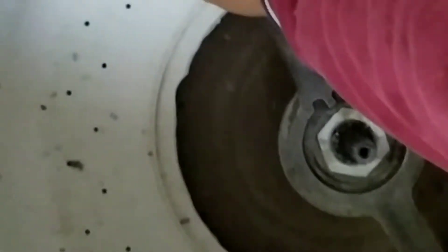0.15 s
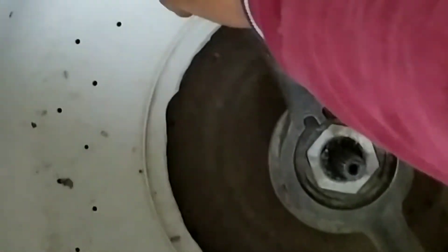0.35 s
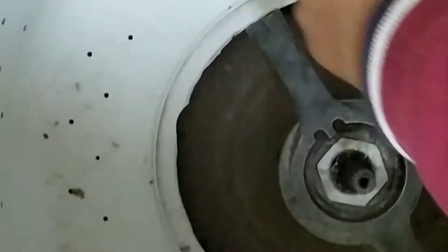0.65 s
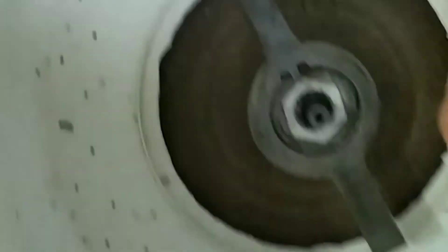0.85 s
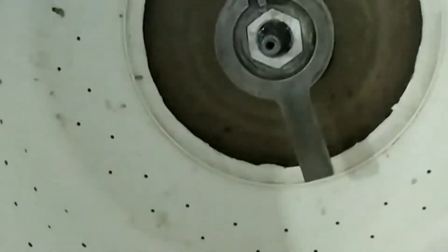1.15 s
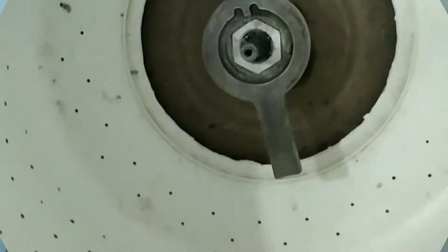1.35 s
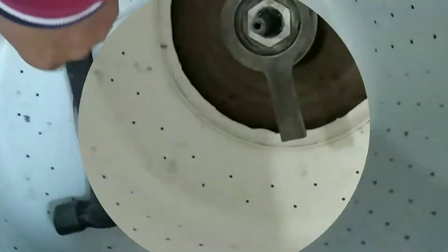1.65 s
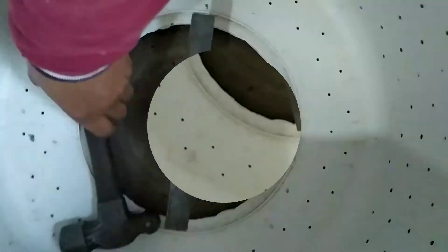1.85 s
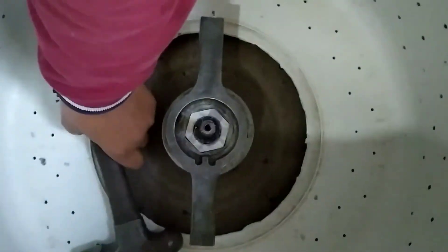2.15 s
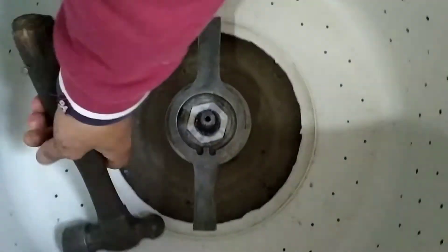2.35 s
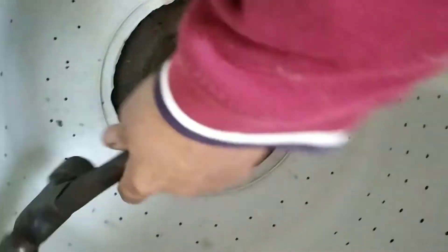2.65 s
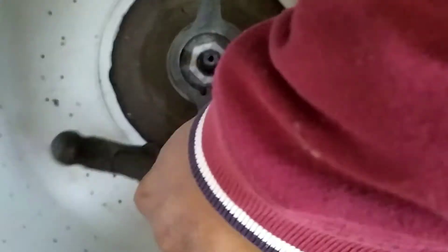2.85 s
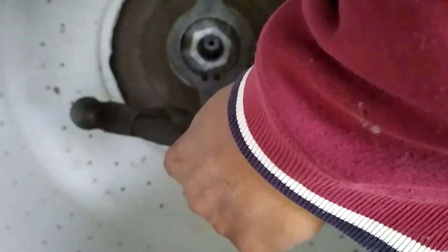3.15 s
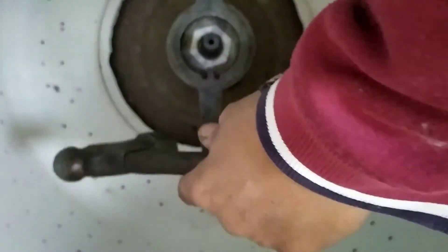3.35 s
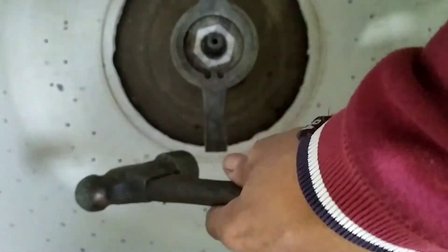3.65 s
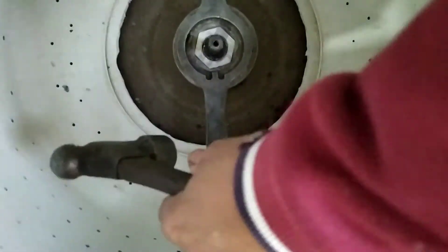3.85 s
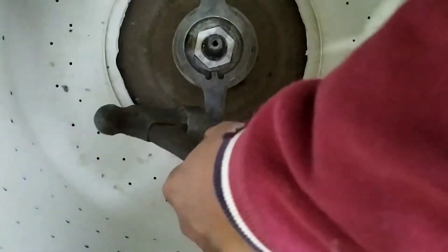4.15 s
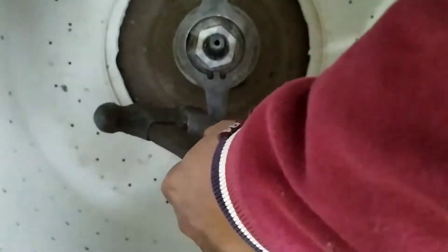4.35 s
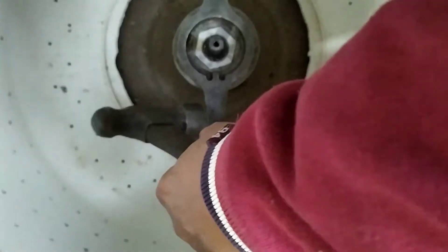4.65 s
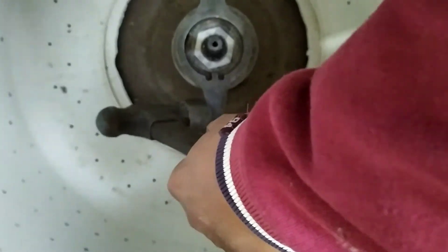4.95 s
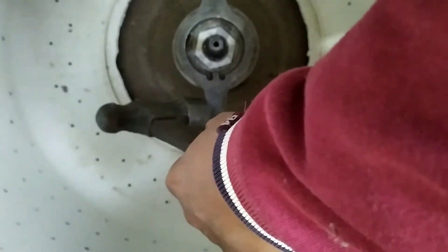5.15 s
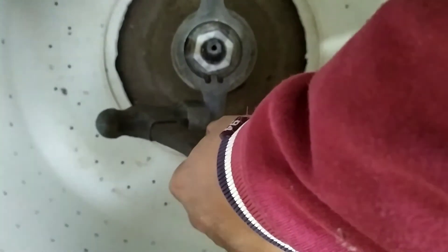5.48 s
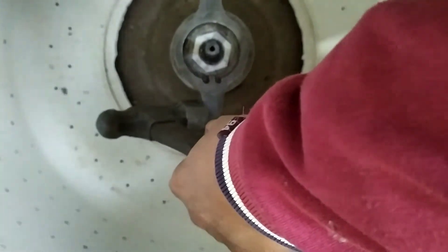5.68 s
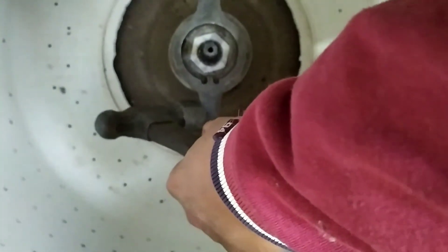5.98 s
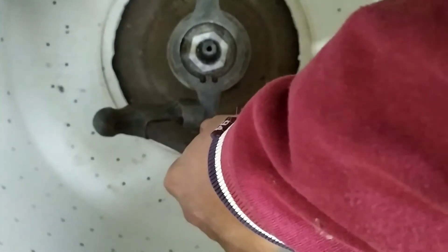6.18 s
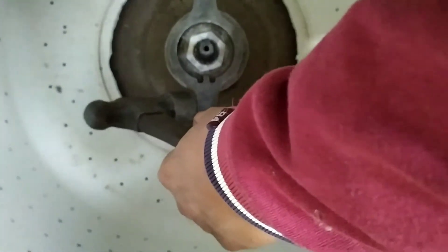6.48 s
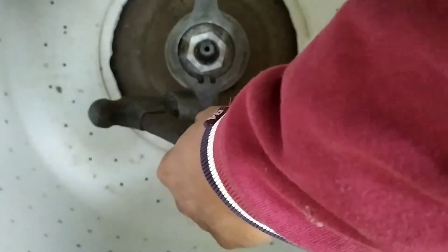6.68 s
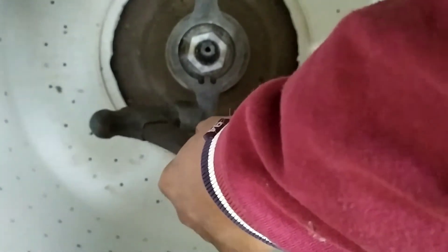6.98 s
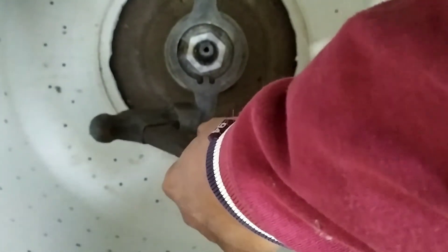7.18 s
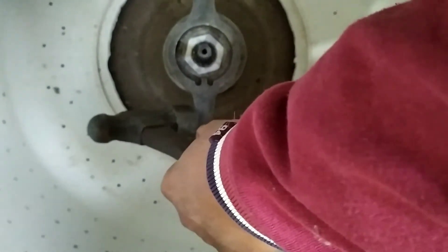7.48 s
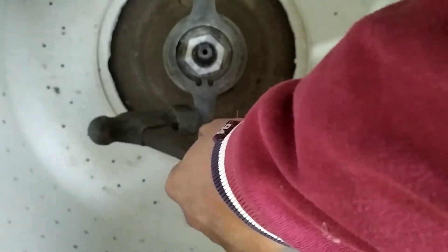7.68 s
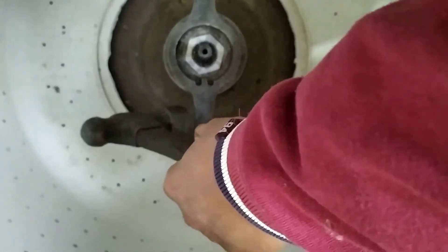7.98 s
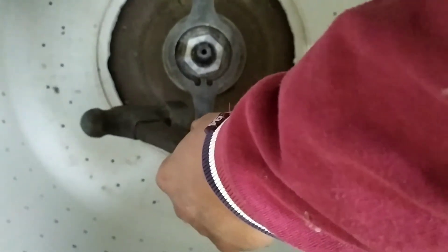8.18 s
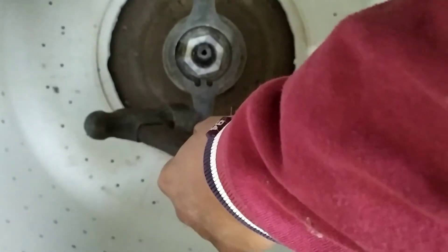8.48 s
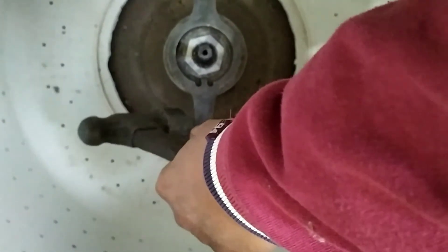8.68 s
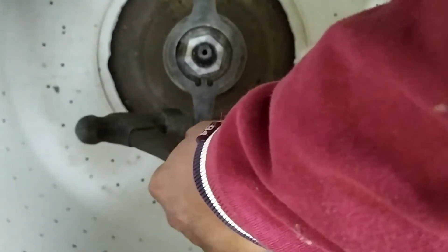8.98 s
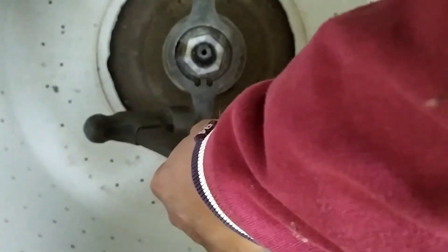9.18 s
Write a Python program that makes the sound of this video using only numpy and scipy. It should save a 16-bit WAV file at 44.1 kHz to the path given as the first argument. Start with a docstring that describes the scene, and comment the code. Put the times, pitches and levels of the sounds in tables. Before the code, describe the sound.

A sleeve rustles and soft knocks and clinks sound as a hammer is picked up, with a louder hollow knock in a washing-machine tub. After a brief rub, the hammer beats a steel spanner in a rapid flurry of sharp, ringing clanks, the tub clattering and thumping beneath. Light taps and several spaced, rebounding blows follow. The sound is close, in a small room with a faint hum.

```python
"""A hammer beats on a steel spanner that sits on the hub nut of a washing-machine tub.
Each impact excites damped modes: the steel rings, the tub clatters, its suspension thumps, and the
spanner rebounds and rattles in its play. Soft knocks and clinks come first, as the hammer is picked up;
between blows it taps and slides. A sleeve rustles, the small room hums, thin tones waver and the level
dips once. A limiter holds the loudest blows down."""
import sys
import numpy as np
from scipy import signal
from scipy.fft import rfft, irfft, next_fast_len
from scipy.io import wavfile
from scipy.ndimage import uniform_filter1d, minimum_filter1d

SR = 44100
rng = np.random.default_rng(int(sys.argv[2]) if len(sys.argv) > 2 else 0)


def materialize(psi):
    """Save the field psi as 16-bit PCM at rate SR to the path in sys.argv[1].

    A 1-D psi becomes a single channel; in a 2-D psi each row is a channel.
    """
    bounded = np.clip(np.atleast_2d(psi).T, -1, 1)
    quanta = np.round(bounded * 32767).astype(np.int16)
    wavfile.write(sys.argv[1], SR, quanta)


N = 411453

# stereo width: frequency_hz, side_minus_mid_db
STEREO_WIDTH = [(100, -21), (280, -15), (470, -8), (1100, 3), (2200, 2.5), (8100, -8), (12500, -2)]
# noise spectra: frequency_hz, relative_density_db
AIR_SPECTRUM = [(25, -24.5), (41, -4), (119, -0.5), (144, -25.5), (260, -6.5), (368, -21), (782, -22),
                (997, -27), (2420, -26), (3170, -35), (15500, -35.5)]
ECHO_SPECTRUM = [(50, 6), (110, 3), (280, 0.5), (450, -10.5), (1000, -20), (2500, -21), (8000, -48)]
CLOTH_SPECTRUM = [(200, -4), (2300, 1.5), (4000, -7.5), (8000, -1.5), (13000, -7), (16000, -24.5)]
SWAY_SPECTRUM = [(45, -26.5), (60, 3.0), (85, -2.5), (130, -13.5), (400, -28), (10000, -87.0)]
CLATTER_SPECTRUM = [(100, -33), (270, -13), (440, -3), (1100, -4.5), (1500, -7.5), (2100, -13.5),
                    (5000, -47.5), (15000, -67)]
CRACK_SPECTRUM = [(800, -20), (1900, 6), (3300, 1), (5000, -2), (6700, -10), (8500, -8), (10000, -23),
                  (15000, -33)]
TICK_SPECTRUM = [(2000, -12), (7200, -9), (8600, 3), (10000, -8), (15000, -10)]
# partials of the room's hum: pitch_hz, level_db
HUM_PARTIALS = [(107.7, -66.5), (259, -68.5)]
# narrow noise bands: centre_hz, width_hz, level_db
THIN_TONE_BANDS = [(1660, 110, -83), (2470, 130, -79)]
RUB_BANDS = [(568, 100, -68), (940, 210, -69.5), (1300, 130, -71.5), (1780, 160, -72.5), (2360, 840, -73)]
# normal modes: pitch_hz, relative_level_db, t60_s
SUSPENSION_MODES = [(75, -11, 0.52), (100.6, 3, 0.28), (119.47, 7, 0.22), (156.3, -3, 0.24)]
TUB_MODES = [(202.6, -10, .15), (304.6, -11, 0.11), (397, -6, 0.26), (458.6, 2, .13), (572.5, -5, .15),
             (695, -3, 0.11), (844, -5, .1), (1014, 2, .08), (1118, -1, 0.13), (1292, -8.5, 0.04),
             (1562, -6.5, 0.038), (1880, -9.5, 0.12), (2157, -5.5, 0.086)]
TUB_FLOOR_MODES = [(312, -1.5, .085), (345, 0, .085), (392, -2.5, .085), (455, -7, .09)]
LOOSE_SPANNER_MODES = [(2277, -11, .28), (2918, -10, .28), (3167, -4, .42), (3709, -1, .35), (4689, 7, .19),
                       (6142, -14, .36), (7257, -8, .2), (7768, 6, .22), (8102, -13, .7), (8581, 3, .09),
                       (10650, -15, .08), (11950, -18, .08), (14190, -19, .28)]
SHANK_MODES = [(2500, -3, .08), (2770, 0, .1), (3180, -3, .09), (3420, -4, .11), (4188, -5, .09),
               (4660, -2.5, .1), (5100, -5, .07), (5600, -7, .09), (6490, -6, .05), (9030, -5, .06)]  # bending of the spanner's arm
STEEL_MODES = [(8100, -1, .135), (4735, -17, .11), (6155, -20, .23), (7255, -11, .15), (7773, -9, .1),
               (8580, -1, .1), (8753, -6, .09), (10780, -12, .08), (11995, -9, .11), (12480, -6, .12),
               (13480, -14, .12), (14300, -16, .09), (14570, -9.5, .1), (14680, -14, .1)]  # the spanner jammed on the nut
# arm movements: start_s, length_s, cloth_db, sway_db
ARM_MOVES = [(-.05, 0.11, -67, -35), (0.103, 0.045, -55.5, -48), (0.286, .1, -74, -42), (0.68, 1, -65, -62),
             (2.036, 0.28, -57.5, -45), (2.239, .2, -53, -44), (2.539, 0.44, -62.5, -44.5),
             (9.023, 0.24, -82, -47)]
# hand and hammer handle on the tub floor: start_s, hollow_db, tap_db, thump_db
SOFT_KNOCKS = [(0.076, -47.5, -30, -41), (0.122, -30, -44.5, -36), (.187, -40.5, -39.5, -59),
               (0.288, -39, -38.5, -39), (0.394, -25.5, -33.5, -30), (0.418, -19, -30.5, -22),
               (.487, -40, -44, -54), (2.092, -34.5, -37.5, -54.5), (2.121, -35, -48, -28),
               (2.264, -5, -19, -31.5), (2.345, -19, -37.5, -53.5), (2.398, 1, -28, -39)]
# the loose spanner against its nut: start_s, ring_db, tick_db
SPANNER_CLINKS = [(0.382, -53, -34.5), (0.421, -28.5, -36)]
# the hammer head being lined up: start_s, level_db, bounce_count
HEAD_TOUCHES = [(3.451, -52.5, 0), (3.587, -53.5, 0), (4.367, -31, 0), (5.382, -41, 0), (5.499, -30, 1),
                (5.583, -40, 0), (6.159, -31.5, 0), (7.35, -28.5, 1), (7.461, -36.5, 1), (7.827, -29.5, 0)]
# blows and rebounds; hardness is steel ring over force:
# start_s, force_db, hardness_db, thump_db, first_mode_lift_db
HAMMER_BLOWS = [(2.398, -7.5, -12.5, -11.5, 0), (4.256, -1, -7, -14.5, -7), (4.297, -8, -21.5, -22.5, -3.5),
                (4.326, -16.5, -33.5, -31, 1.5), (4.634, -1, -9, -12, 2), (4.652, -10.5, -2, -30.5, 9),
                (4.679, -12, -9, -27.5, 17.5), (4.7, -3.5, -14.5, -13.5, -5.5), (4.749, -9, 1.5, -15, 0),
                (4.784, -10.5, -18.5, -17, 0.5), (4.811, -12, -5.5, -17, -4.5),
                (4.841, -14.5, -12, -23.5, 0.5), (4.894, 0, -4, -28.5, 0.5), (4.913, -6, -8.5, -18.5, -1.5),
                (4.955, -14.5, -15, -18.5, 1), (4.972, -8, -11.5, -14.5, -9.5),
                (5.002, -12.5, -21, -18.5, 6), (5.02, -8, -27, -20, 6.5), (5.049, -13, -23, -27, 0.5),
                (6.792, -7.5, -15, -18, 5.5), (6.818, -11, -34.5, -23.5, 2.5),
                (6.849, -14.5, -35.5, -36.5, 7), (7.079, -7, -12.5, -21, 2.5), (7.105, -11, -24, -28.5, -1),
                (7.274, -7, -21.5, -26, -2.5), (7.298, -12.5, -21, -30, 0), (7.73, -14, -39.5, -34, 0.5),
                (8.503, -6.5, -14, -22, -1), (8.525, -13.5, -28, -30, 5), (8.909, -4.5, -4, -20.5, 1.5),
                (8.943, -9, -23.5, -26.5, 3.5), (8.976, -12, -17, -38, 2), (9.3, 0, -7.5, -27.5, -4.5)]


def undb(db):
    """Amplitude grows tenfold every 20 dB."""
    return 10 ** (np.asarray(db) / 20)


def colour(points, hz):
    """A spectral envelope: gain at hz, interpolated in decibels over log frequency."""
    point_hz, db = np.transpose(points)
    return undb(np.interp(np.log(hz + 1), np.log(point_hz), db))


def noise(spectrum, size=N):
    """Shaped noise of rms 1; independent mid and side signals make the channels partly coherent."""
    padded = next_fast_len(size, True)
    hz = np.arange(padded // 2 + 1) * SR / padded
    width = colour(STEREO_WIDTH, hz)
    mid, side = rfft(rng.standard_normal((2, padded))) * colour(spectrum, hz) / np.hypot(1, width)
    stereo = irfft([mid + width * side, mid - width * side], padded)[:, :size]
    return stereo / stereo.std()


def fade(t, t60, rise_s):
    """Damped vibration builds up, then decays exponentially, 60 dB in t60 seconds."""
    return (1 - np.exp(-t / rise_s)) * np.exp(-np.log(1000) * t / t60)


def add(out, start_s, sound):
    """Superposition: a sound adds to the mix from start_s on."""
    start = max(int(start_s * SR), 0)
    out[:, start:start + sound.shape[1]] += sound[:, :max(N - start, 0)]


def wander(rate_hz):
    """Random modulation: Gaussian values joined by straight lines."""
    return np.interp(np.arange(N) / SR * rate_hz, np.arange(N), rng.standard_normal(N))


def gate(start_s, end_s, ramp_s):
    """A trapezoidal envelope: fade in, hold, fade out."""
    t = np.arange(N) / SR
    return np.clip(np.minimum(t - start_s, end_s - t) / ramp_s, 0, 1)


def wavering(bands, flicker_db, flicker_hz):
    """Amplitude modulation makes each narrow band of noise swell and fade on its own."""
    out = np.zeros((2, N))
    for hz, width_hz, db in bands:
        bandpass = signal.butter(2, [hz - width_hz / 2, hz + width_hz / 2], "bandpass", fs=SR, output="sos")
        mid, side = signal.sosfilt(bandpass, rng.standard_normal((2, N)))
        band = mid + np.outer([1, -1], side) * colour(STEREO_WIDTH, hz)
        band *= undb(flicker_db * wander(flicker_hz))
        out += undb(db) * band / band.std()
    return out


def bursts(times, levels_db, spectrum, t60, rise_s):
    """Modes too dense to resolve act as decaying noise; overlapping hits add in power."""
    power = np.zeros((1, N))
    envelope = fade(np.arange(int(0.87 * t60 * SR))[None] / SR, t60, rise_s)
    for start_s, db in zip(times, levels_db):
        add(power, start_s, (undb(db) * envelope) ** 2)
    return np.sqrt(power) * noise(spectrum)


def rings(times, levels_db, modes, rise_s, scatter_db, detune, tilt_db=0, damping=1, first_db=0):
    """A struck body sounds a sum of damped modes; contact point and grip scatter level and pitch."""
    hz, mode_db, t60 = np.transpose(modes)
    spread = np.outer([1, -1], np.arctan(colour(STEREO_WIDTH, hz)))
    draws = rng.standard_normal((len(times), 4, len(hz)))
    hits = zip(*np.broadcast_arrays(times, levels_db, tilt_db, damping, first_db), draws)
    out = np.zeros((2, N))
    for start_s, db, db_per_octave, damp, lift_db, (strength, pitch, phase, lean) in hits:
        t = np.arange(int(t60.max() / damp * SR), dtype=np.float32) / SR
        decay = fade(t, t60[:, None] / damp, rise_s)
        gain = undb(mode_db + scatter_db * strength + db_per_octave * np.log2(hz))
        # each mode reaches the two channels with its own phase and level difference
        weights = gain * np.exp((1j + .3 * lean) * spread)
        weights *= undb(db) * 2 / np.linalg.norm(weights)
        weights[:, 0] *= undb(lift_db)
        cycles = np.outer(hz * (1 + detune * pitch), t) + phase[:, None]
        angle = (2 * np.pi * cycles).astype(np.float32)
        add(out, start_s, weights.real @ (decay * np.sin(angle)) + weights.imag @ (decay * np.cos(angle)))
    return out


def background(air_db=-59.5):
    """The room's noise floor: broadband air and a steady sinusoidal hum."""
    t = np.arange(N) / SR
    hum = sum(undb(db) * np.sqrt(2) * np.sin(2 * np.pi * (hz * t + rng.random()))
              for hz, db in HUM_PARTIALS)
    return undb(air_db) * noise(AIR_SPECTRUM) + hum


def thin_tones():
    """Narrowband noise is heard as faint, wavering pitches."""
    return wavering(THIN_TONE_BANDS, flicker_db=6, flicker_hz=7) * gate(5.2, 7.3, ramp_s=.3)


def level_dip(at_s=1.724, depth_db=25, fall_s=0.13, recover_s=0.064):
    """Brief attenuation: the level sinks, then relaxes back."""
    t = np.arange(N) / SR - at_s
    depth = np.clip(1 + t / fall_s, 0, 1) * np.exp(-np.maximum(t, 0) / recover_s)
    return undb(-depth_db * depth)


def reverberation(sound, t60=0.91, wet_db=-29):
    """Reflections from bare walls merge into a dull tail, applied by convolution."""
    tail = noise(ECHO_SPECTRUM, size=SR) * fade(np.arange(SR) / SR, t60, rise_s=0.018)
    tail /= np.sqrt(np.sum(tail ** 2) / 2)
    return undb(wet_db) * signal.fftconvolve(sound[:1], tail, axes=1)[:, :N]


def arm_envelope(levels_db, attack_s, t60):
    """Incoherent sounds add in power; each arm movement swells, holds and dies away."""
    power = np.zeros(N)
    for (start_s, length_s, _, _), db in zip(ARM_MOVES, levels_db):
        t = np.maximum(np.arange(N) / SR - start_s, 0)
        release_db = 60 * np.maximum(t - length_s, 0) / t60
        power += (undb(db - release_db) * (1 - np.exp(-t / attack_s))) ** 2
    return np.sqrt(power)


def sleeve_and_sway(grain_db=3.0, scuff_db=1.24):
    """Stick-slip friction makes cloth rustle while the arm rocks the tub on its springs."""
    _, _, cloth_db, sway_db = np.transpose(ARM_MOVES)
    grains = undb(grain_db * wander(rate_hz=60) + scuff_db * wander(rate_hz=14))
    sway = noise(SWAY_SPECTRUM) * arm_envelope(sway_db, attack_s=.024, t60=1)
    cloth = noise(CLOTH_SPECTRUM) * grains * arm_envelope(cloth_db, attack_s=.018, t60=.68)
    return cloth + sway


def hammer_rub():
    """Sliding friction excites hollow resonances as the hammer moves into place."""
    return wavering(RUB_BANDS, flicker_db=2.5, flicker_hz=16) * gate(3.55, 4.18, ramp_s=.09)


def soft_knocks():
    """A slow contact carries little treble, so it mostly sounds the hollow floor of the tub."""
    start_s, hollow_db, tap_db, thump_db = np.transpose(SOFT_KNOCKS)
    hollow = rings(start_s, hollow_db, TUB_FLOOR_MODES, rise_s=.009, scatter_db=2.1, detune=.0028)
    tap = rings(start_s, tap_db, TUB_MODES, rise_s=.0004, scatter_db=1.5, detune=.034,
                tilt_db=-7, damping=1.2)
    scuff = bursts(start_s, tap_db - 20, CRACK_SPECTRUM, t60=.036, rise_s=.0034)
    thump = rings(start_s, thump_db, SUSPENSION_MODES, rise_s=.0015, scatter_db=6, detune=.091)
    return hollow + tap + scuff + thump


def spanner_clinks():
    """Free vibration: the loose spanner chatters, then rings longer and lower than when jammed."""
    start_s, ring_db, tick_db = np.transpose(SPANNER_CLINKS)
    ring = rings(start_s, ring_db, LOOSE_SPANNER_MODES, rise_s=.0014, scatter_db=1.5, detune=.0003)
    chatter = rings(start_s, ring_db - 9, LOOSE_SPANNER_MODES, rise_s=.001, scatter_db=3, detune=.025,
                    damping=4)
    crack = bursts(start_s, tick_db, CRACK_SPECTRUM, t60=.034, rise_s=.0008)
    tick = bursts(start_s, tick_db - 4, TICK_SPECTRUM, t60=.045, rise_s=.001)
    return ring + chatter + crack + tick


def hammer_touches(bounce_s=.024, loss_db=0.5):
    """Weak impulses, some with a bounce, clack in the tub but are too light to ring the steel."""
    contacts = [(at_s + k * bounce_s, db - k * loss_db)
                for at_s, db, bounces in HEAD_TOUCHES for k in range(round(bounces) + 1)]
    start_s, level_db = np.transpose(contacts)
    tub = rings(start_s, level_db, TUB_MODES, rise_s=.0008, scatter_db=1, detune=.047, damping=1.8)
    clatter = bursts(start_s, level_db - 3, CLATTER_SPECTRUM, t60=.092, rise_s=.00027)
    crack = bursts(start_s, level_db - 30, CRACK_SPECTRUM, t60=.08, rise_s=.001)
    thump = rings(start_s, level_db - 13, SUSPENSION_MODES, rise_s=.0074, scatter_db=.5, detune=.028)
    return tub + clatter + crack + thump


def tub_shock():
    """Structure-borne sound: the hub passes each blow to the tub and its suspension."""
    start_s, force_db, _, thump_db, _ = np.transpose(HAMMER_BLOWS)
    shock_db = force_db - 1.5
    clatter = bursts(start_s, shock_db, CLATTER_SPECTRUM, t60=.08, rise_s=.0001)
    # a long, heavy push gives more thump and a duller tub; a short, light tap sounds brighter
    db_per_octave = 0.14 * (force_db - thump_db - 13.5) - 0.041 * (force_db + 7.5)
    tub = rings(start_s, shock_db, TUB_MODES, rise_s=.0006, scatter_db=3, detune=.011,
                tilt_db=db_per_octave, damping=1.15)
    thump = rings(start_s, thump_db, SUSPENSION_MODES, rise_s=.01, scatter_db=.5, detune=.044)
    return clatter + tub + thump


def hammer_on_spanner(hardness_share=0.51, chatter_delay_s=.009):
    """Impact of steel on steel: the harder the contact, the more it cracks and excites high modes."""
    start_s, force_db, hardness_db, _, lift_db = np.transpose(HAMMER_BLOWS)
    steel_db = force_db + hardness_db
    contact_db = force_db + hardness_share * hardness_db - 9.5
    tick = bursts(start_s, steel_db + 6, TICK_SPECTRUM, t60=.042, rise_s=.0035)
    crack = bursts(start_s, contact_db + 4, CRACK_SPECTRUM, t60=.068, rise_s=.004)
    # the spanner chatters in its play just after each contact
    late_s = start_s + chatter_delay_s * rng.uniform(.6, 1.4, len(start_s))
    chatter = rings(late_s, contact_db - 1, SHANK_MODES, rise_s=.0008, scatter_db=4, detune=.045,
                    damping=1.5)
    shank = rings(start_s, contact_db + 1, SHANK_MODES, rise_s=.001, scatter_db=4.5, detune=.012)
    steel = rings(start_s, steel_db, STEEL_MODES, rise_s=.004, scatter_db=3.5, detune=.0005,
                  first_db=lift_db)
    # while hammer and nut still press on the spanner, its modes are shifted and die sooner
    pressed = rings(start_s, steel_db - 1, STEEL_MODES, rise_s=.003, scatter_db=3, detune=.008,
                    damping=2.1)
    return tick + crack + chatter + shank + steel + pressed


def scene(knock_echo_db=-3):
    """Direct sound, reverberation and background superpose; the brief dip acts on them all."""
    metal = hammer_on_spanner() + tub_shock() + hammer_touches() + spanner_clinks()
    knocks = soft_knocks()
    echo = reverberation(metal + undb(knock_echo_db) * knocks)
    quiet_sounds = sleeve_and_sway() + hammer_rub() + thin_tones() + background()
    return (metal + knocks + echo + quiet_sounds) * level_dip()


def record(dry, low_cut_hz=51, top_hz=15000, threshold=1.8, window_s=.0031, release_db_per_s=400):
    """Band and peak limiting: a bass cut, a look-ahead limiter, soft saturation and a treble cut."""
    dry = signal.sosfilt(signal.butter(2, low_cut_hz, "highpass", fs=SR, output="sos"), dry)
    over_db = 20 * np.log10(np.maximum(1, np.abs(dry).max(axis=0) / threshold))
    recovery_db = release_db_per_s * np.arange(N) / SR
    cut_db = np.maximum.accumulate(over_db + recovery_db) - recovery_db
    span = int(window_s * SR)
    limited = dry * uniform_filter1d(minimum_filter1d(undb(-cut_db), span), span)
    rounded = limited / (1 + (limited / .9) ** 6) ** (1 / 6)
    return signal.sosfilt(signal.ellip(8, .2, 70, top_hz, fs=SR, output="sos"), rounded)


dry = scene()
out = record(dry)
materialize(out)
```